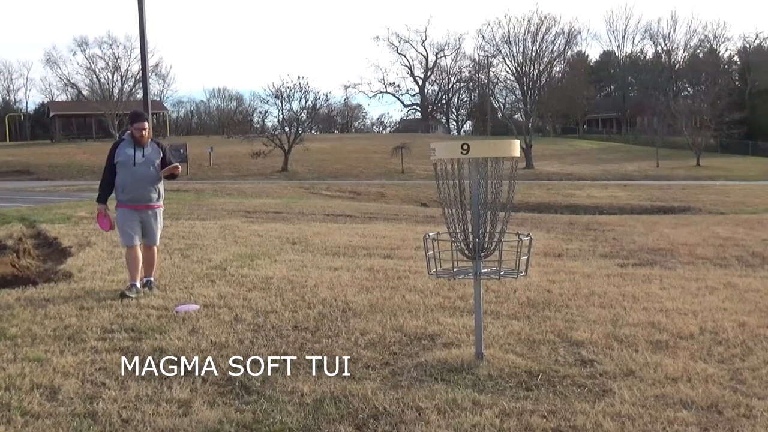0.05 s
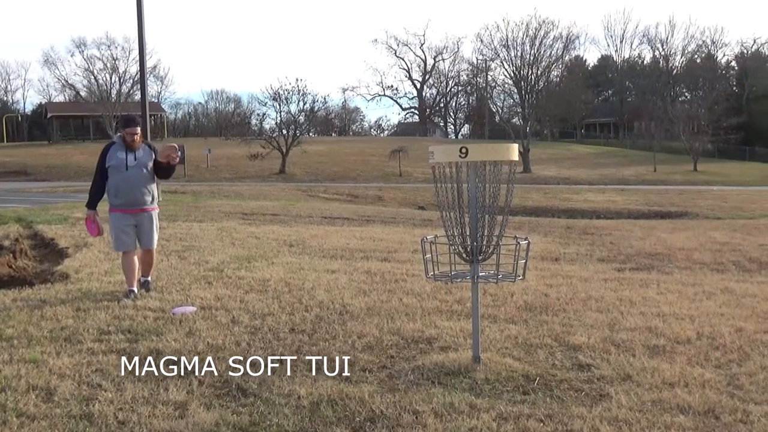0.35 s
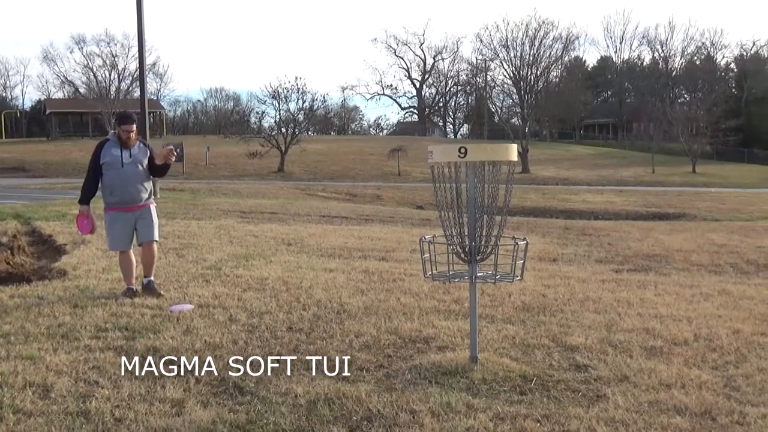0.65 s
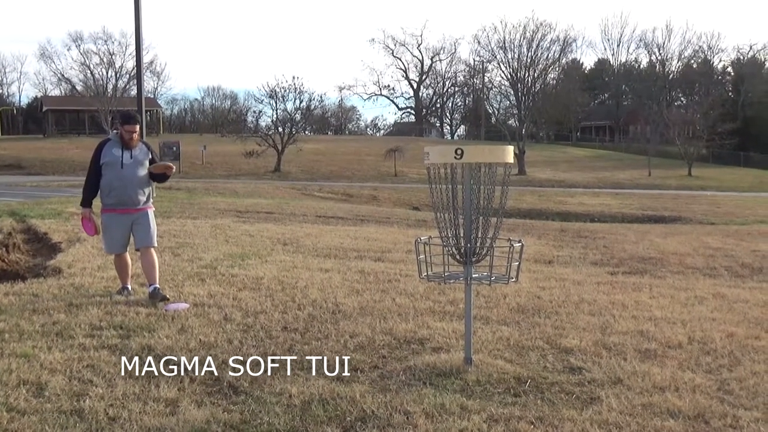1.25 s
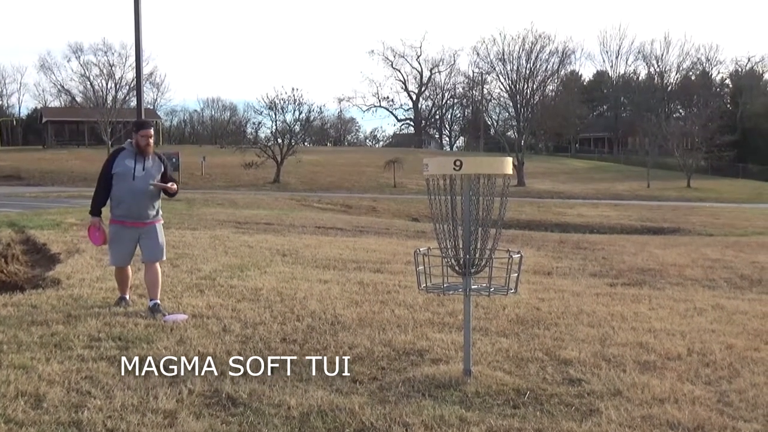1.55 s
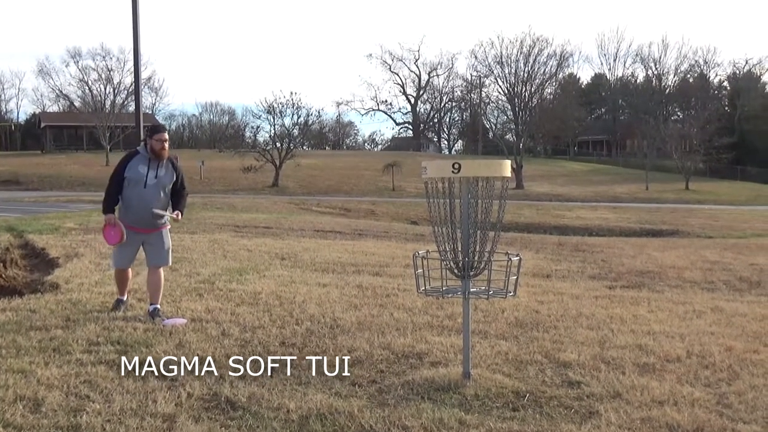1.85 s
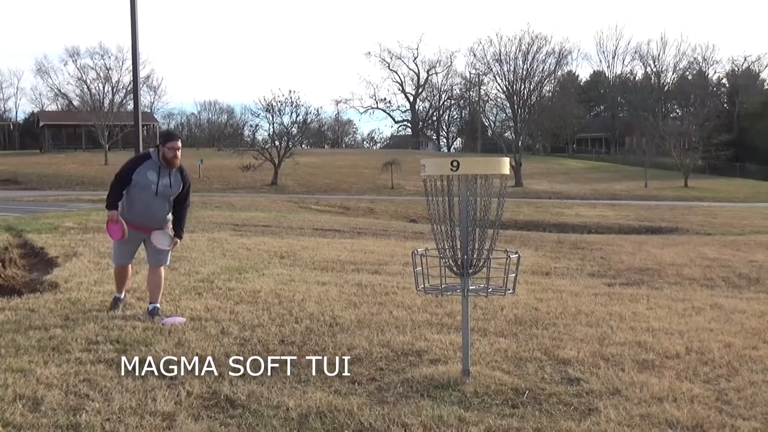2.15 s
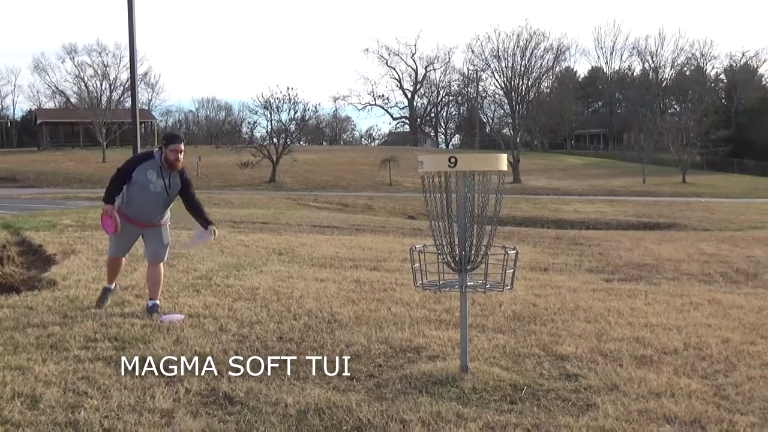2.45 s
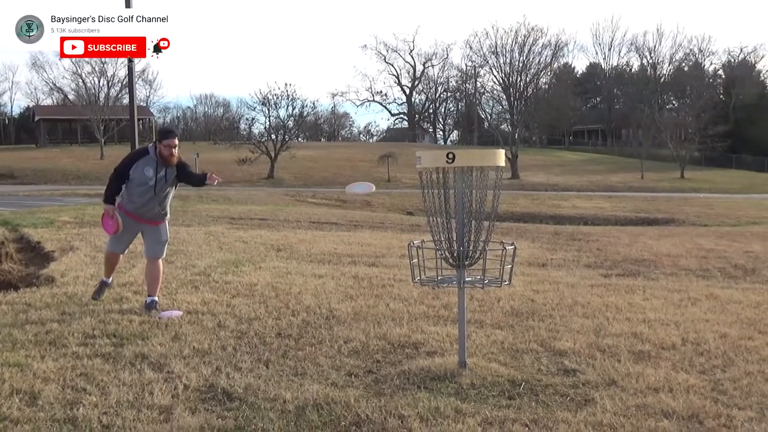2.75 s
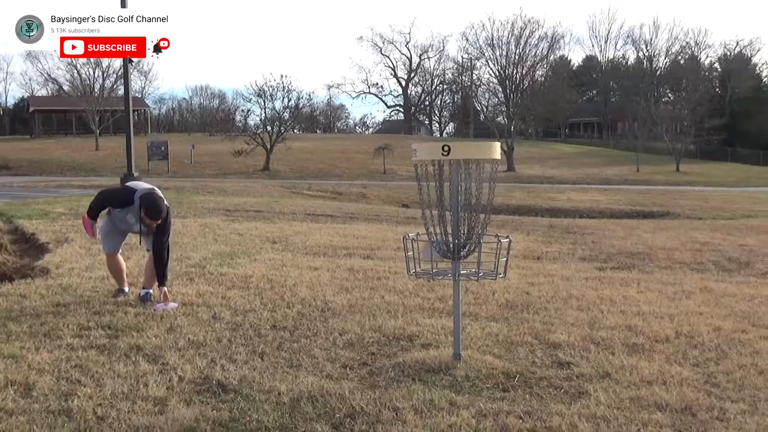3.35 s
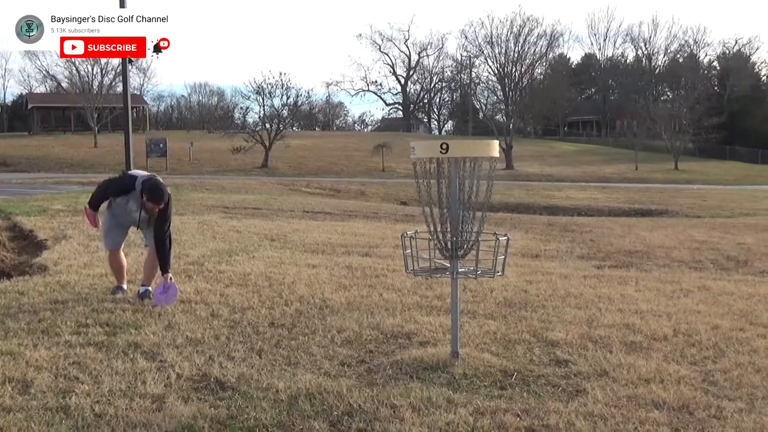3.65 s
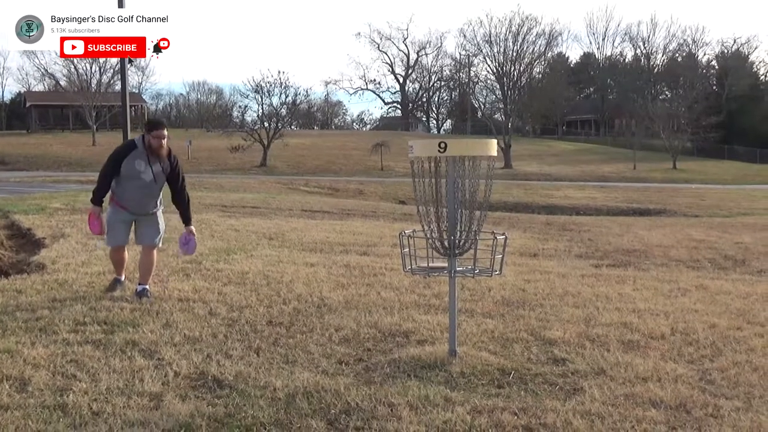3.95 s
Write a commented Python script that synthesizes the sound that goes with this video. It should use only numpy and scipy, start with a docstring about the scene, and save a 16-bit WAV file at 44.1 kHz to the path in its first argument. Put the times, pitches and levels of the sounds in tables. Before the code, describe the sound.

Steel chains of a disc golf basket crash and rattle brightly as a plastic disc hits, just after a dry double click. Before that, only faint wind, soft steps in dry grass and a distant bird in an open field.

```python
"""Steel chains of a disc golf basket, hit by a plastic disc just after a dry double click.
Each jolt sets off a shower of contacts: links clash and ring, the wire tray hums.
The disc knocks on pole and tray; the swinging strands clink on.
Before the hit: steps swishing in dry grass, a far bird. Throughout: faint wind, a distant rumble."""
import sys
import numpy as np
from scipy import signal
from scipy.fft import rfft, irfft, next_fast_len
from scipy.io import wavfile
from scipy.ndimage import map_coordinates

SR = 44100
rng = np.random.default_rng(int(sys.argv[2]) if len(sys.argv) > 2 else 0)


def store_pcm(level_fs):
    """Save levels as 16-bit WAV."""
    pcm = np.round(np.clip(level_fs, -1, 1) * 32767).astype(np.int16)
    wavfile.write(sys.argv[1], SR, np.atleast_2d(pcm).T)


N = 176400
T = np.arange(N) / SR

# chain jolts: t/s, rise/s, t60/s, clash/dB, low ring/dB, high ring/dB
CHAIN_JOLTS = [(2.931, 0.001, 0.64, -18.5, -54.5, -16.5), (2.966, 0.048, 0.46, -43, -15.5, -16),
               (3.062, .01, 0.46, -26, -25.5, -15.5), (3.214, 0.0059, 0.23, -32.5, -29.5, -26),
               (3.273, 0.0036, 0.14, -32.5, -46, -23), (3.291, 0.002, 0.44, -25, -31.5, -18.5),
               (3.355, 0.0084, 0.43, -38, -34.5, -27), (3.464, 0.013, 0.6, -38.5, -40.5, -33),
               (3.642, 0.016, 0.36, -35.5, -36, -31), (3.79, 0.069, 0.91, -46, -50, -38)]
# link modes, three bands: f/Hz, link-to-link spread/Hz, level/dB, t60/s
LINK_LOW = [(4468, 2, 0, .33), (4525, 10, -1, .22), (4825, 25, -12, .14), (4780, 170, -12, .08)]
LINK_MID = [(9074, 112, -1, 0.055), (9360, 740, -4.5, 0.056)]
LINK_HIGH = [(11768, 25, -4, .11), (12035, 32, 1, .11), (12330, 130, -6, .08), (12875, 30, -7, .11),
             (13900, 80, -18, .08), (14350, 80, -22, .08)]
# spectra of steel-on-steel clash and tray hum: f/Hz, level/dB
CLASH_SPECTRUM = [(100, -49), (400, -28.5), (750, -11.5), (1200, -12.5), (1550, -6), (1800, -2), (2200, -6),
                  (3600, -7), (4400, 2.5), (5200, 4.5), (7300, -1.5), (8700, 3.5), (10800, 2.5),
                  (13000, -0.5), (14500, -16), (16000, -22)]
TRAY_SPECTRUM = [(60, -36), (180, -6), (400, -8.5), (600, -3), (850, 2), (1200, 0), (1550, -8), (1820, 10),
                 (2150, -3.5), (2600, 0), (3100, -0.5), (3800, -10), (6000, -30), (16000, -60)]
# single link strikes: t/s, low ring/dB, mid ring/dB, high ring/dB, tick/dB
LINK_STRIKES = [(2.922, -38, -45, -45, -22), (3.176, -34.5, -26.5, -16.5, -24), (3.517, -55, -35, -41, -46),
                (3.548, -49, -34, -28.5, -46), (3.635, -42.5, -34, -46, -39), (3.652, -33, -41, -49, -39),
                (3.677, -40.5, -34, -27, -36), (3.713, -63, -38, -34, -48), (3.731, -47, -55, -32, -49),
                (3.767, -65, -50, -25, -41), (3.784, -49, -40, -26, -35), (3.831, -43, -33, -44, -52),
                (3.88, -42, -19.5, -24, -27.5), (3.909, -37, -26, -45, -53),
                (3.921, -51, -20.5, -27, -28.5), (3.936, -56, -41, -26.5, -30),
                (3.960, -59, -34, -26, -34.5), (3.979, -61, -24, -29, -32.5)]
# disc on pole and tray: t/s, plastic/dB, steel/dB
DISC_KNOCKS = [(2.938, -17.5, -29), (2.956, -37, -48), (3.078, -38, -55.5), (3.222, -35, -55),
               (3.294, -31, -26), (3.314, -32, -38), (3.343, -35.5, -37), (3.468, -36, -39.5),
               (3.618, -41, -68)]
# modes of disc and basket steel: f/Hz, level/dB, t60/s
DISC_MODES = [(654, -3, 0.039), (816, 7, 0.02), (1303, -13, 0.064), (1806, -7, 0.15), (2410, -0.5, 0.027),
              (2953, -2, 0.06)]
BASKET_MODES = [(5803, -11, .6), (6170, -9, .5), (6406, -12, .6), (7122, -7, .5), (7311, -6, .5),
                (7881, -2, .3), (8125, -3, .6), (8220, -4, .7), (8278, 0, .7), (8426, -3, .6),
                (8624, -3, .7), (8898, 2, .3), (9663, -3, .4), (10250, -5, .7)]
# double click pulses: t/s, snap/dB, hollow body/dB, t60/s
CLICK_PULSES = [(2.8379, -31, -29, 0.011), (2.8409, -17.5, -40, 0.01), (2.844, -22.5, -34, 0.025),
                (2.8601, -25.5, -22, 0.0075), (2.8622, -39, -19, 0.027)]
# spectra of snap and hollow body: f/Hz, level/dB
SNAP_SPECTRUM = [(300, -10), (2000, -24), (2900, 10), (3700, -5.5), (4700, 10), (6000, -11), (7800, 5.5),
                 (9000, -3), (11600, 5), (13000, -20), (15300, -10), (16500, -35)]
HOLLOW_SPECTRUM = [(50, -10.5), (300, -36), (600, -21), (820, 10.5), (1100, -11), (1800, -2), (2400, -11),
                   (4000, -10), (7000, -27), (16000, -50)]
# steps: peak t/s, Gaussian width/s, level/dB
STEP_SWISHES = [(0.095, 0.18, -61.5), (.78, .12, -56), (0.59, 0.13, -63), (1.38, 0.22, -62),
                (2.45, 0.15, -71)]
# dry grass swish: f/Hz, level/dB
GRASS_SPECTRUM = [(100, -55), (2000, -5.5), (4500, -18.5), (6500, -11.5), (8000, -3), (9400, 1.5),
                  (11000, -5), (13000, -17), (16000, -35)]
# snapping stalks: t/s, level/dB, centre f/Hz
STALK_SNAPS = [(.1005, -42, 6150), (.529, -47, 2930), (1.012, -58, 3500), (1.325, -54, 2850),
               (1.76, -62, 2900), (2.17, -52, 3600)]
# spectrum of one stalk: multiple of centre f, level/dB
STALK_SPECTRUM = [(.05, -50), (.35, -20), (.8, 0), (1.25, 2), (1.6, -18), (4, -33)]
# bird calls: t/s, length/s, held f/Hz, level/dB
BIRD_CALLS = [(.545, 0.066, 4150, -62.5), (2.12, 0.082, 4280, -60.5)]
# wind envelope: t/s, relative level/dB
WIND_ENVELOPE = [(0, -59.5), (.4, -57), (.8, -57), (1.1, -58), (1.35, -57), (1.7, -56), (2.05, -58),
                 (2.3, -59), (2.8, -58.5), (4, -55.5)]
# wind rush: f/Hz, level/dB
WIND_SPECTRUM = [(15, -75), (25, -58), (59, -18.5), (108, -9.5), (212, -9.5), (285, -12), (451, -9.5),
                 (516, -8), (624, -1), (734, -2), (863, -1), (1130, -6.5), (1230, -8), (1330, -7),
                 (1940, -10.5), (2840, -22), (16000, -34.5)]
# wind stereo image: f/Hz, left-right correlation
WIND_CORRELATION = [(60, 1), (300, 1), (900, 0.83), (3000, 0.41), (12000, 1)]
# far rumble: f/Hz, level/dB
RUMBLE_SPECTRUM = [(25, -44), (60, -17), (110, -2), (170, -0.5), (260, -5), (500, -7), (2000, -60)]
# scatter off ground and trees: f/Hz, level/dB
SCATTER_SPECTRUM = [(100, -18), (900, -29), (4000, -4), (9000, 6.5), (13000, -23)]
# microphone treble response: f/Hz, level/dB
MIC_RESPONSE = [(13500, 0.5), (14800, 2.5), (15500, -4), (16200, -26)]


def chain_rattle(links=24, extra_per_s=2700, floor_per_s=700, settle_s=0.27, spread_db=3.5):
    """Jolts drive a thinning shower of contacts; each clashes, rings one link and stirs the tray."""
    start_s = CHAIN_JOLTS[0][0]
    t = T[int(start_s * SR):]
    envelopes = np.array([np.clip((t - at_s) / rise_s, 0, 1) * decay(t - at_s - rise_s, t60_s)
                          for at_s, rise_s, t60_s, *_ in CHAIN_JOLTS])
    jolt_gains = amp(np.array(CHAIN_JOLTS)[:, 3:]).T
    clash, low, high = np.sqrt(jolt_gains ** 2 @ envelopes ** 2)  # jolts add in power
    chance = (floor_per_s + extra_per_s * np.exp(-(t - start_s) / settle_s)) / SR
    sizes = amp(spread_db * np.clip(rng.standard_normal(len(t)), -2, 2))
    sizes *= rng.choice([-1, 1], len(t))
    contacts = unit_rms((rng.random(len(t)) < chance) * sizes / np.sqrt(chance))
    struck_link = rng.integers(links, size=len(t))
    out = np.zeros(N)
    for k in range(links):
        hits = contacts * (struck_link == k)
        responses = steel_clash(), link_ring(LINK_LOW), link_ring(LINK_MID + LINK_HIGH)
        for force, response in zip((clash, low, high), responses):
            add(out, start_s, excite(hits * force, response))
    add(out, start_s, tray_hum(contacts * clash))
    return out


def steel_clash(crack_t60_s=0.015, wires_t60_s=0.11, wires_db=-11):
    """A contact cracks, then shivers on in the basket wires."""
    return burst(CLASH_SPECTRUM, crack_t60_s) + amp(wires_db) * burst(CLASH_SPECTRUM, wires_t60_s)


def link_ring(modes, spread=1, damping=1):
    """One link rings, slightly detuned from its neighbours."""
    return ring([(hz + spread * spread_hz * rng.normal(), db, t60_s / damping)
                 for hz, spread_hz, db, t60_s in modes])


def tray_hum(force, gain_db=-19, t60_s=7.5):
    """The wire tray hums on under the contacts."""
    return amp(gain_db) * excite(force, burst(TRAY_SPECTRUM, t60_s, samples=len(force)))


def chain_clinks(tick_attack_s=0.0018, tick_t60_s=0.034):
    """Swinging strands meet; each blow ticks and favours different link modes."""
    out = np.zeros(N)
    for at_s, *rings_db, tick_db in LINK_STRIKES:
        tick = burst(CLASH_SPECTRUM, tick_t60_s)
        attack = 1 - np.exp(-T[:len(tick)] / tick_attack_s)
        add(out, at_s, amp(tick_db) * tick * attack)
        for db, modes in zip(rings_db, (LINK_LOW, LINK_MID, LINK_HIGH)):
            add(out, at_s, amp(db) * link_ring(modes, spread=0.567, damping=0.94))
    return out


def disc_knocks():
    """Plastic knocks dully and leaves the basket steel ringing."""
    out = np.zeros(N)
    for at_s, plastic_db, steel_db in DISC_KNOCKS:
        add(out, at_s, amp(plastic_db) * ring(DISC_MODES) + amp(steel_db) * ring(BASKET_MODES))
    return out


def double_click(thump_at_s=2.847, thump_hz=62.4, thump_db=-39, thump_t60_s=0.11):
    """A bright snap, then a hollow one, over a slight thump."""
    out = np.zeros(N)
    for at_s, snap_db, hollow_db, t60_s in CLICK_PULSES:
        snap = amp(snap_db) * burst(SNAP_SPECTRUM, t60_s)
        hollow = amp(hollow_db) * burst(HOLLOW_SPECTRUM, t60_s)
        add(out, at_s, snap + hollow)
    thump = np.sin(2 * np.pi * thump_hz * T) * decay(T, thump_t60_s)
    add(out, thump_at_s, amp(thump_db) * thump)
    return out


def steps(rough_db=1.25, rough_per_s=30.44):
    """Shoes swish through dry grass and snap a few stalks."""
    power = sum((amp(db) * np.exp(-0.5 * ((T - peak_s) / width_s) ** 2)) ** 2
                for peak_s, width_s, db in STEP_SWISHES)
    out = np.sqrt(power) * amp(rough_db * wobble(rough_per_s)) * noise(GRASS_SPECTRUM)
    for at_s, db, centre_hz in STALK_SNAPS:
        spectrum = [(ratio * centre_hz, level_db) for ratio, level_db in STALK_SPECTRUM]
        add(out, at_s, amp(db) * burst(spectrum, t60_s=0.009))
    return out


def bird(bend=0.154, bend_s=0.0073, echoes=2, first_echo_db=-12, echo_gap_s=0.05):
    """A thin far whistle slides up and holds; trees echo it faintly."""
    out = np.zeros(N)
    for at_s, length_s, held_hz, db in BIRD_CALLS:
        t = T[:int(length_s * SR)]
        pitch_hz = held_hz * (1 - bend * np.exp(-t / bend_s))
        envelope = amp(db) * np.sin(np.pi * t / length_s)
        call = envelope * np.sin(2 * np.pi * np.cumsum(pitch_hz) / SR)
        for k in range(echoes + 1):
            add(out, at_s + k * echo_gap_s, amp(first_echo_db * np.sqrt(k)) * call)
    return out


def wind(gain_db=5, flutter_db=0.5, flutter_per_s=9.16, pan_db=0.72):
    """A soft far rush, nearly alike left and right."""
    def width_rad(hz):
        return np.arccos(np.clip(log_interp(WIND_CORRELATION, hz), -1, 1)) / 2

    mid = filtered(noise(WIND_SPECTRUM), lambda hz: np.cos(width_rad(hz)))
    side = filtered(noise(WIND_SPECTRUM), lambda hz: np.sin(width_rad(hz)))
    level_db = np.interp(T, *np.transpose(WIND_ENVELOPE)) + gain_db
    level_db += flutter_db * wobble(flutter_per_s)
    return amp(level_db) * np.array([mid + side, mid - side]) * amp([[-pan_db], [pan_db]])


def rumble(start_db=-80.5, rise_db_per_s=4):
    """A far low rumble grows slowly."""
    return amp(start_db + rise_db_per_s * T) * noise(RUMBLE_SPECTRUM)


def field_scatter(x, gain_db=-24, t60_s=0.083):
    """Weak stereo scatter off ground and trees."""
    tail = rng.standard_normal((2, SR // 2)) * decay(T[:SR // 2], t60_s)
    tail = filtered(tail / np.linalg.norm(tail[0]), lambda hz: gain_at(SCATTER_SPECTRUM, hz))
    return amp(gain_db) * signal.fftconvolve(x[None], tail, axes=1)[:, :N]


def amp(db):
    """dB to gain."""
    return 10 ** (np.asarray(db) / 20)


def unit_rms(x):
    """Scale to rms 1."""
    return x / np.sqrt(np.mean(x ** 2) + 1e-20)


def log_interp(points, hz):
    """Interpolate (f/Hz, value) rows over log frequency."""
    knots_hz, values = np.transpose(points)
    return np.interp(np.log(hz + 1), np.log(knots_hz + 1), values)


def gain_at(spectrum, hz):
    """Linear gain of a spectrum at hz."""
    return amp(log_interp(spectrum, hz))


def filtered(x, response):
    """Zero-phase filter with gain response(hz)."""
    n = x.shape[-1]
    padded = next_fast_len(n + 8192)
    return irfft(rfft(x, padded) * response(np.fft.rfftfreq(padded, 1 / SR)), padded)[..., :n]


def noise(spectrum):
    """Coloured noise, rms 1."""
    return unit_rms(filtered(rng.standard_normal(N), lambda hz: gain_at(spectrum, hz)))


def wobble(knots_per_s):
    """Smooth random curve."""
    return map_coordinates(rng.standard_normal(256), [T * knots_per_s], mode="wrap")


def decay(t, t60_s):
    """Exponential fall, 60 dB per t60_s."""
    return np.exp(-np.log(1000) * np.maximum(t, 0) / t60_s)


def burst(spectrum, t60_s, samples=16384):
    """Decaying coloured noise."""
    puff = rng.standard_normal(samples) * decay(T[:samples], t60_s)
    rms_gain = np.sqrt(np.mean(gain_at(spectrum, np.fft.rfftfreq(samples, 1 / SR)) ** 2))
    return filtered(puff, lambda hz: gain_at(spectrum, hz)) / rms_gain


def ring(modes, attack_s=0.00064):
    """Damped sines from (f/Hz, level/dB, t60/s) rows, starting near rms 1."""
    t = T[:SR]
    sines = sum(amp(db) * decay(t, t60_s) * np.sin(2 * np.pi * (hz * t + rng.random()))
                for hz, db, t60_s in modes)
    power = sum(amp(db) ** 2 for _, db, _ in modes) / 2
    return sines * (1 - np.exp(-t / attack_s)) / np.sqrt(power)


def excite(force, response):
    """Convolve force with the response at unit energy."""
    return signal.fftconvolve(force, response / np.linalg.norm(response))


def add(out, at_s, x):
    """Mix x into out from at_s."""
    i = int(at_s * SR)
    out[i:i + len(x)] += x[:max(N - i, 0)]


def scene():
    """Open field; basket, steps and bird straight ahead with scatter, the click dry."""
    ahead = chain_rattle() + chain_clinks() + disc_knocks() + steps() + bird()
    return ahead + field_scatter(ahead) + double_click() + wind() + rumble()


def record(dry, limit_hz=16200):
    """Microphone: slight treble peak, steep roll-off, hard band limit."""
    return filtered(dry, lambda hz: gain_at(MIC_RESPONSE, hz) * (hz < limit_hz))


dry = scene()
out = record(dry)
store_pcm(out)
```